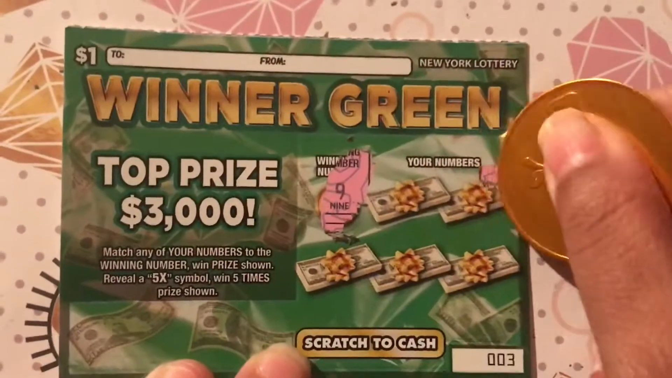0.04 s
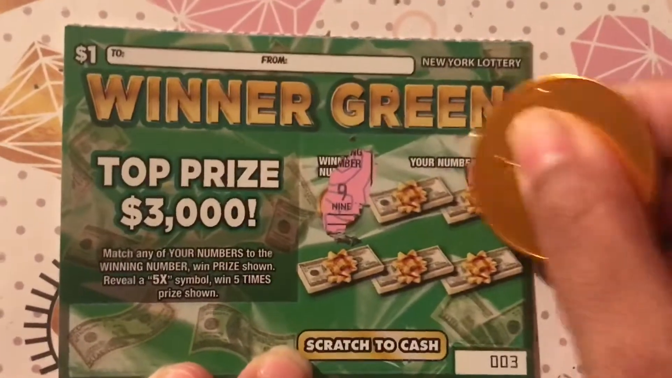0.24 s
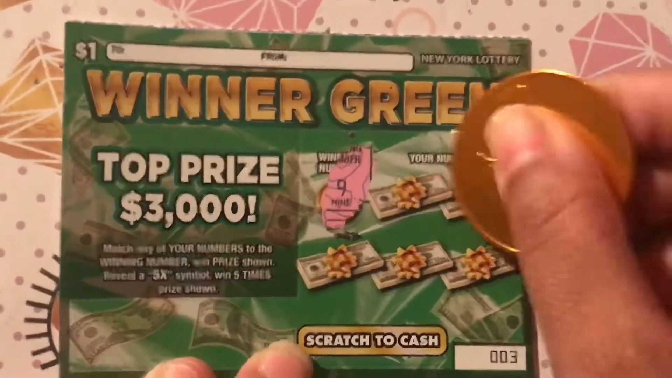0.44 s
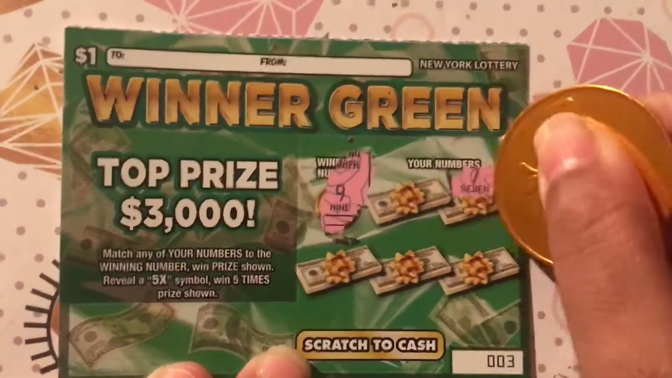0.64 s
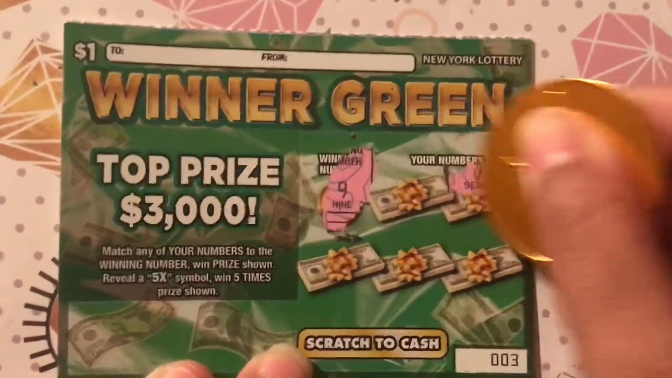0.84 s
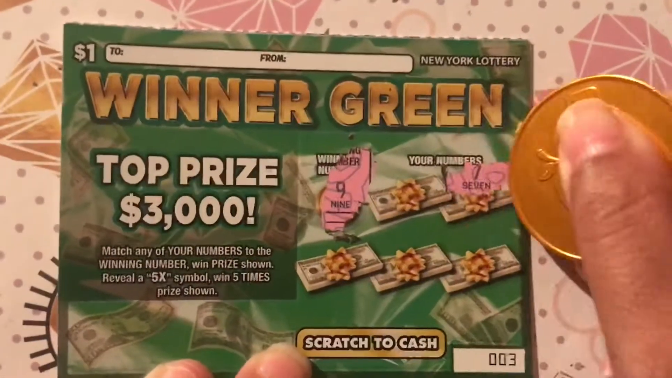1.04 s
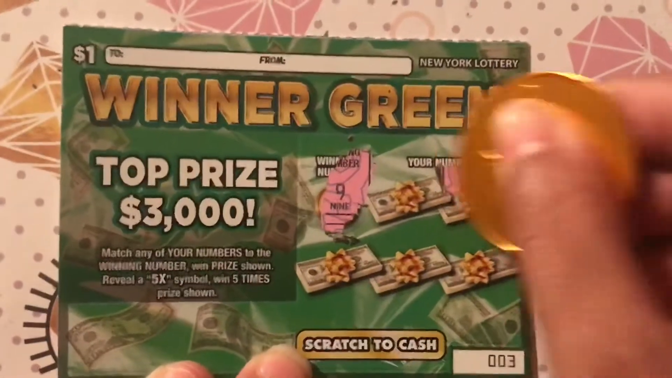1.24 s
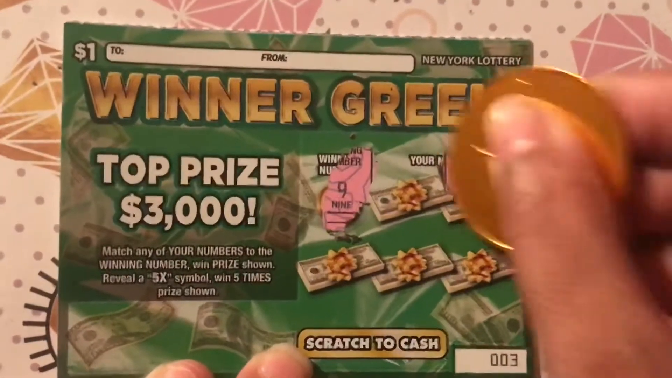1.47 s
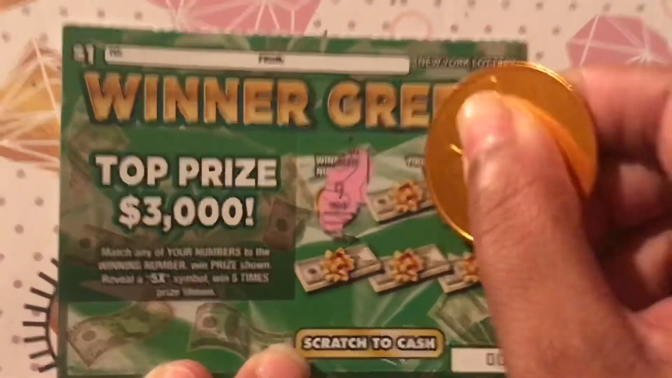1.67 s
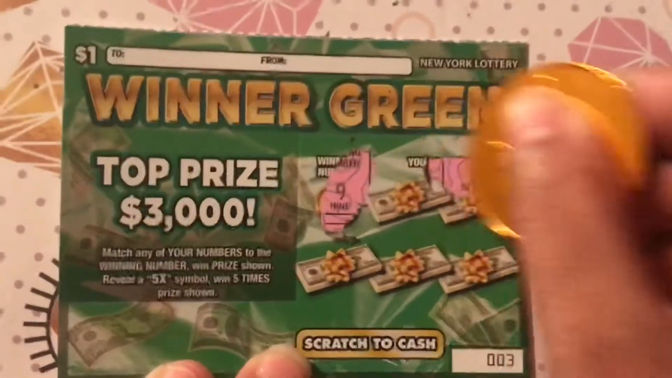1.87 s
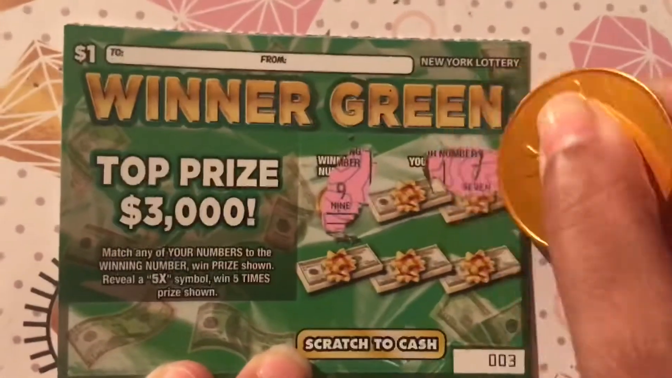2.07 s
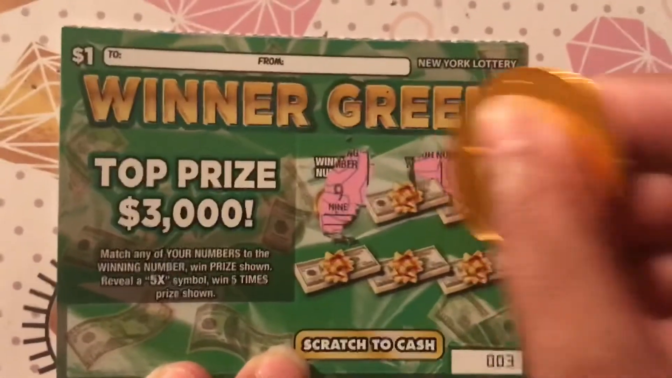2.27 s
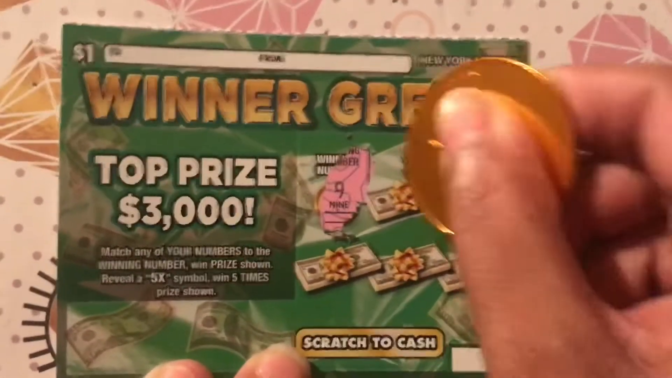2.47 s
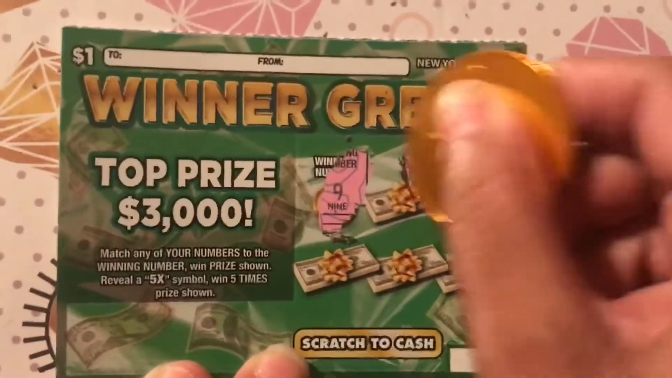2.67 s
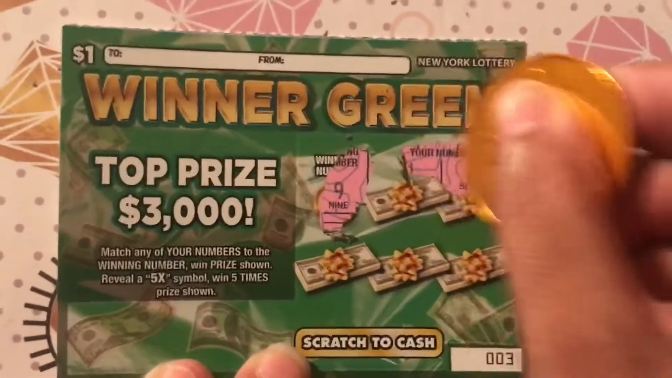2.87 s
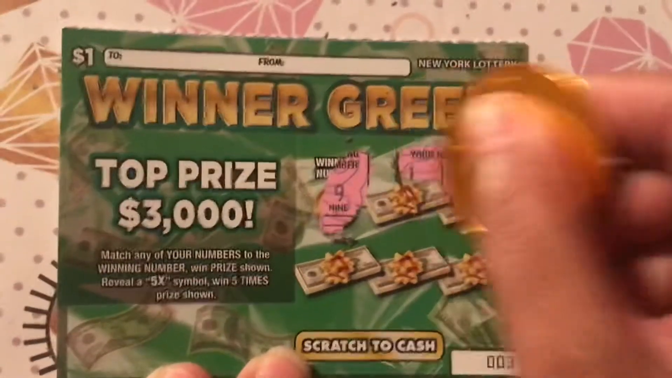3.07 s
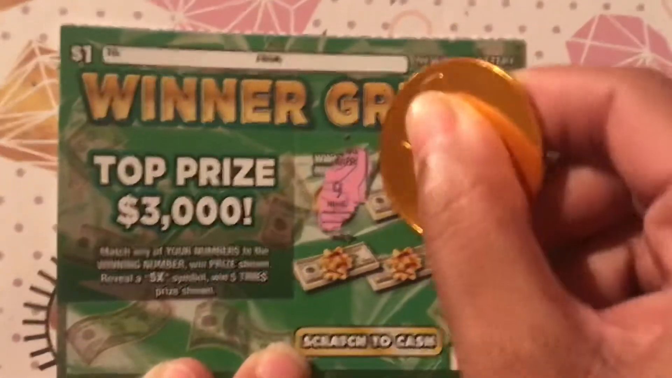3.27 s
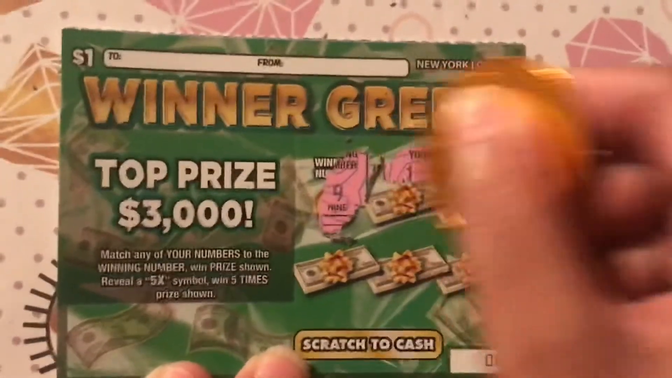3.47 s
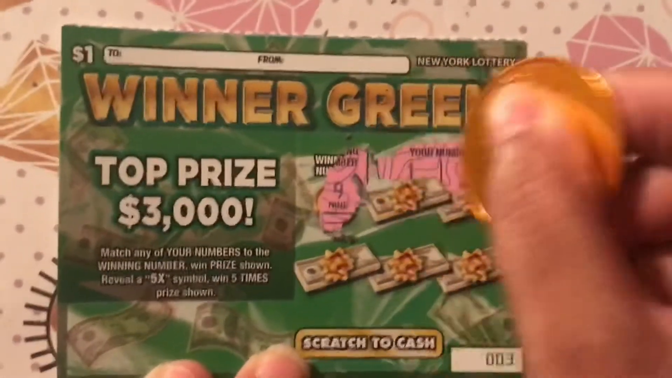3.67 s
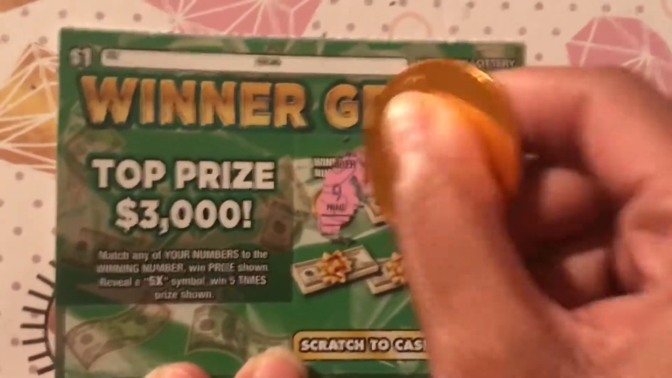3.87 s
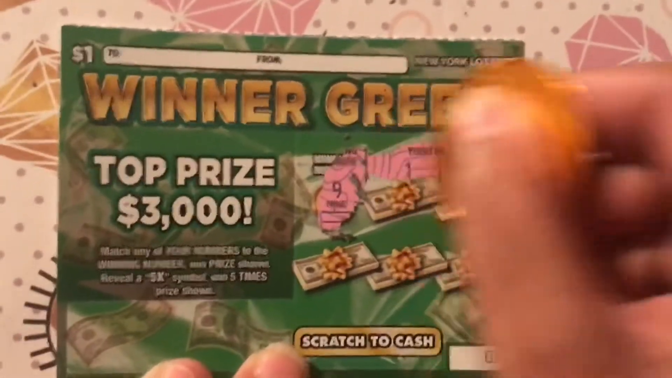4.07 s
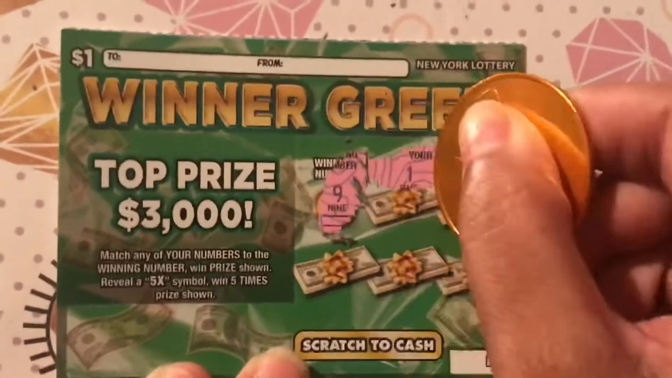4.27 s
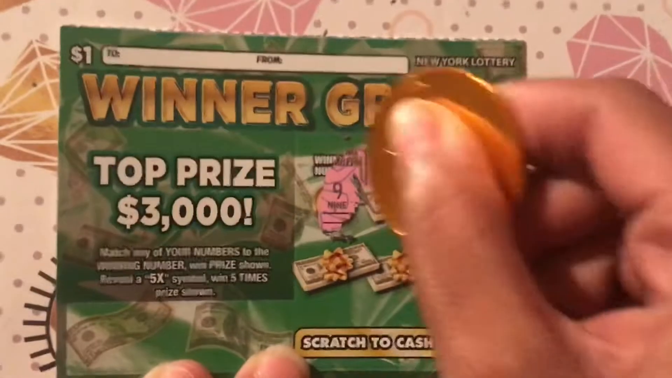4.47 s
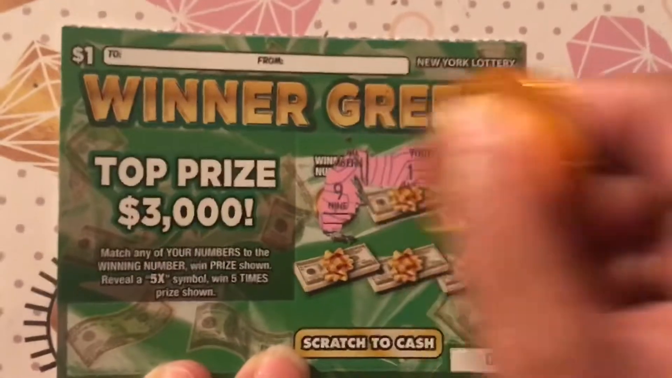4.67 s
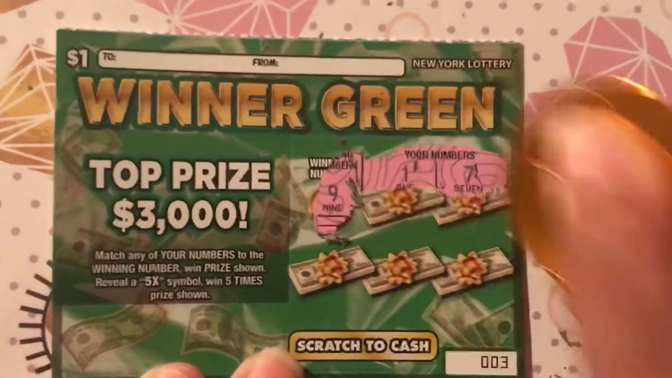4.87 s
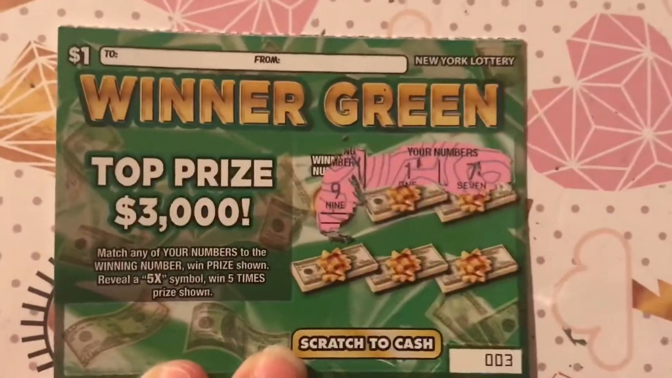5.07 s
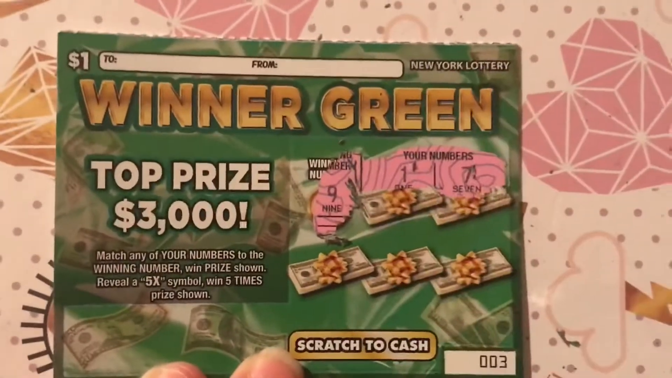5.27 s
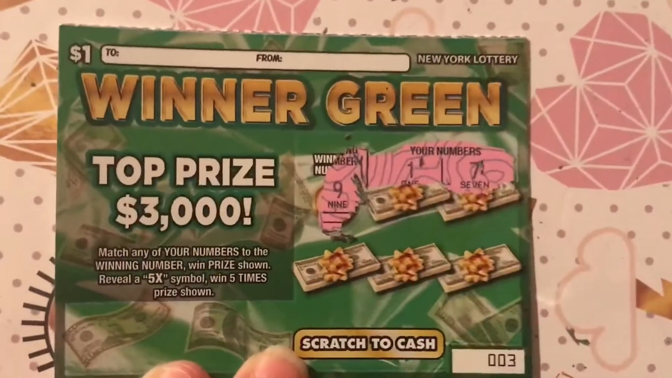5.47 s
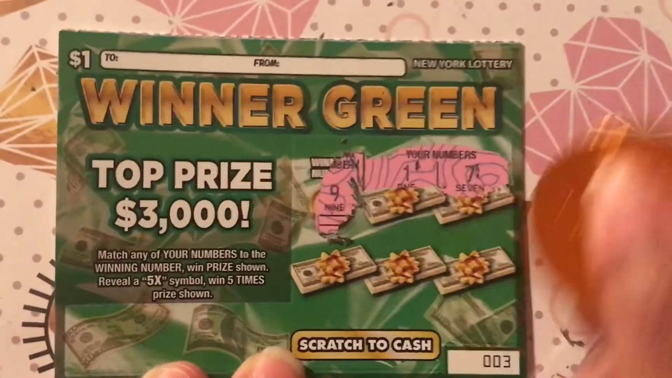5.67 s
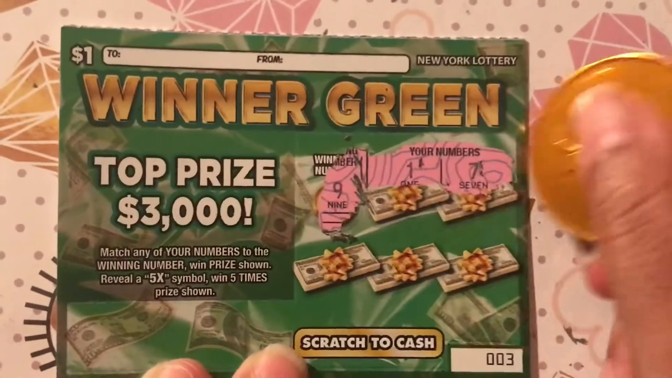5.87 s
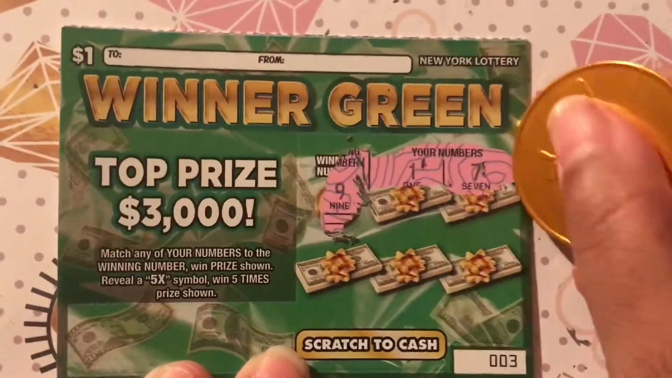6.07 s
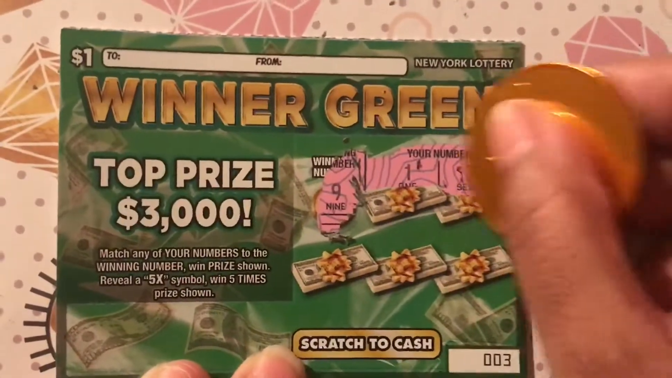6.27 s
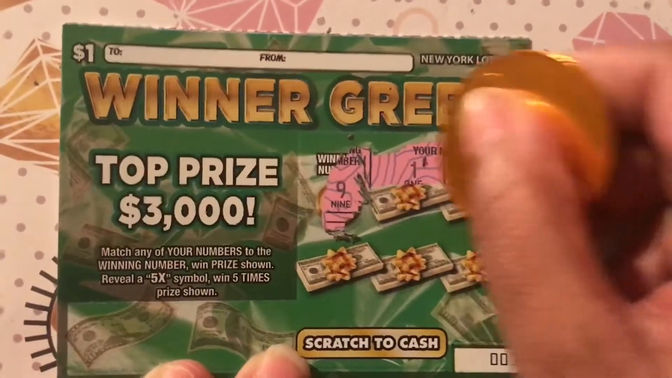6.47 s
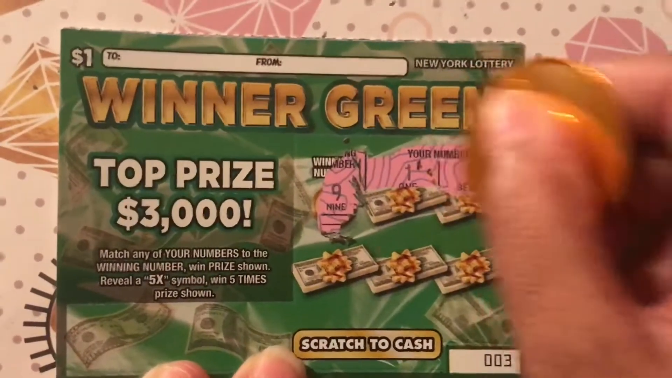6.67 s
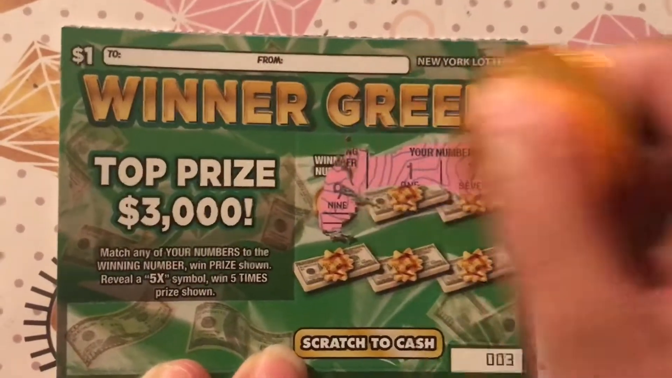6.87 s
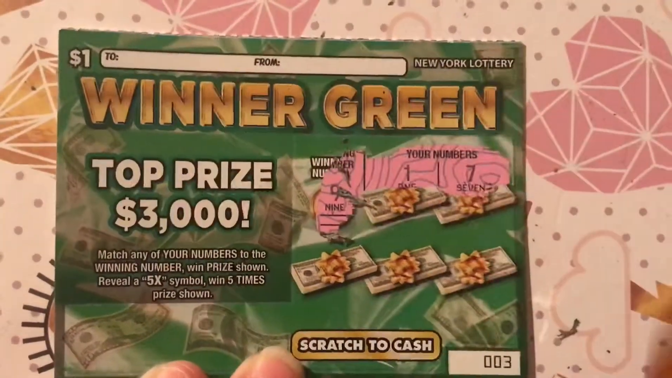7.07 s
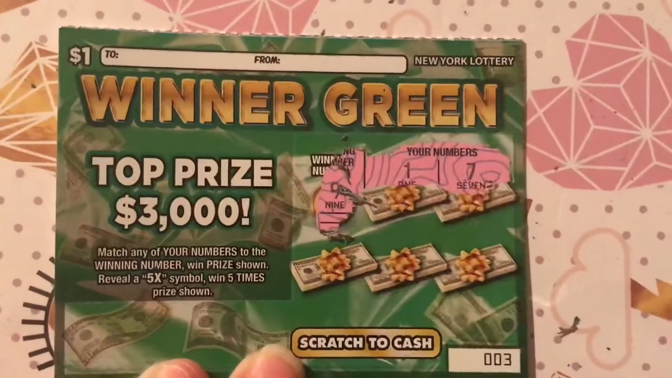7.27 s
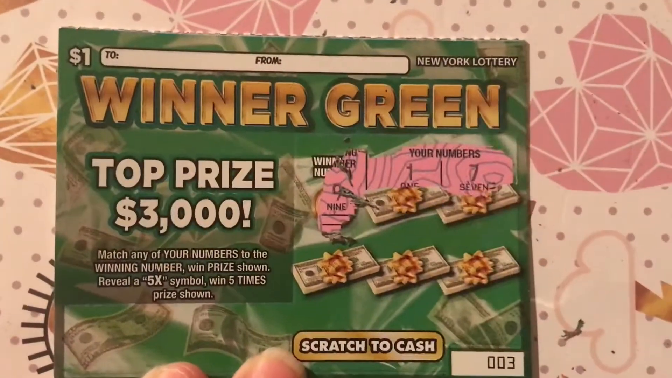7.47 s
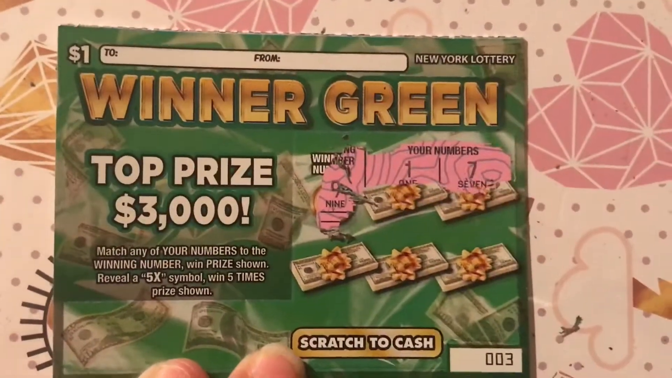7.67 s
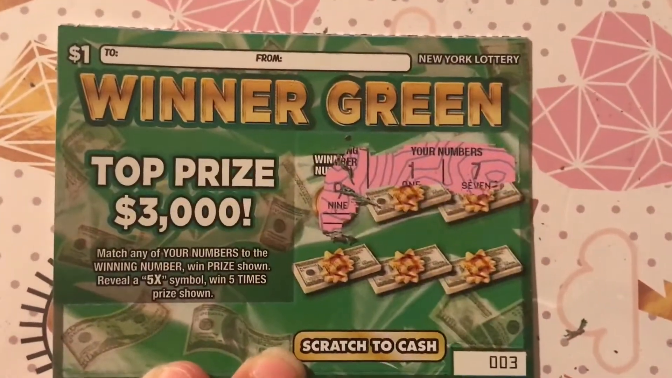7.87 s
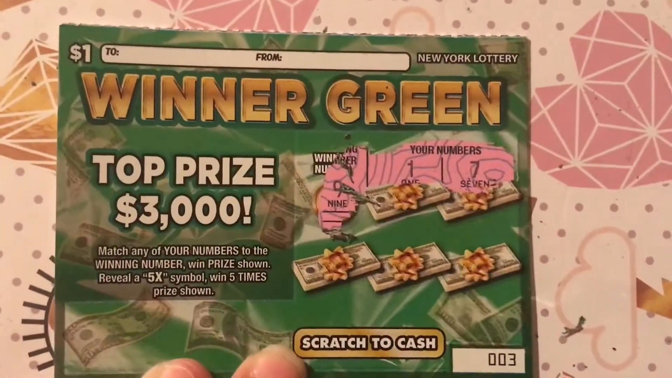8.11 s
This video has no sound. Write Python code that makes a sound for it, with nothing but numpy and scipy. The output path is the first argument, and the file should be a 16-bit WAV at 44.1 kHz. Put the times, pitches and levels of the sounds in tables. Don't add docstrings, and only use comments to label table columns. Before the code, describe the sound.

Close up in a quiet, dry room, a coin scratches the coating off a paper card: a few strokes, a brief gap, then a long steady run of about eight a second, hard pulls alternating with lighter returns. Card drums, coating hisses, small clicks and dull table thumps mix in. After a pause with a faint finger rub, a short lighter burst ends in a coarse dig, then quiet.

```python
import sys
import numpy as np
from scipy import signal
from scipy.fft import rfft, irfft
from scipy.io import wavfile
from scipy.ndimage import uniform_filter1d

SR = 44100
rng = np.random.default_rng(int(sys.argv[2]) if len(sys.argv) > 2 else 0)


def unload_audio(sound):
    columns = np.transpose(np.atleast_2d(sound))
    steps = np.round(np.clip(columns, -1, 1) * 32767)
    wavfile.write(sys.argv[1], SR, steps.astype(np.int16))


def undo_db(level):
    steps = np.asarray(level, float) / 20
    return 10 ** steps


N = 358974

# (pitch [Hz], width [Hz], level [dB])
CARD_MODES = [(217, 16.6, -2), (390, 8.7, -5.5), (551, 49.4, -0.5), (693.4, 51, -1), (799, 57, -4),
              (937, 72, -4.5), (1086, 91, -6.5), (1335, 330, -12.5), (1810, 650, -16.5)]
# (frequency [Hz], level [dB per Hz])
COATING_COLOUR = [(700, -27), (1200, -4), (1900, -1.5), (3200, 1), (3800, -6.5), (4900, -6.5), (5800, -2),
                  (7600, -2), (8900, -5.5), (10700, -1.5), (11800, -8), (12800, -14), (15900, -13.5)]

SET_OFF_S, RUN_OUT_S = 0.014, 0.0087
# (on pulls, on returns, per dB of hiss, per dB of flatness)
RASP_GRIP = (-9.5, -1, 0.36, 0.2539)


def rms_one(x):
    return x / np.sqrt(np.mean(x ** 2) + 1e-20)


def filtered(x, order, hz, kind="low"):
    return signal.sosfilt(signal.butter(order, hz, kind, fs=SR, output="sos"), x)


def gain_over_time(tables):
    out = np.zeros(N)
    for rows in map(np.array, tables):
        times, dbs = rows[:, 0], rows[:, 1]
        i = np.arange(int(times[0] * SR), min(int(times[-1] * SR), N))
        fade = np.minimum(np.minimum(i - i[0], i[-1] - i) / 200, 1)
        out[i] = np.maximum(out[i], fade * undo_db(np.interp(i / SR, times, dbs)))
    return out


def coloured(x, spectrum):
    hz, db = np.transpose(spectrum)
    grid = np.maximum(np.arange(4097) * SR / 8192, 1)
    cepstrum = irfft(np.log(undo_db(np.interp(np.log(grid), np.log(hz), db))))
    cepstrum[1:4096] *= 2
    cepstrum[4097:] = 0
    response = irfft(np.exp(rfft(cepstrum)))
    return rms_one(signal.fftconvolve(x, response)[:N])


def resonance(x, hz, width_hz):
    r = np.exp(-np.pi * width_hz / SR)
    feedback = [1, -2 * r * np.cos(2 * np.pi * hz / SR), r * r]
    return signal.lfilter([(1 - r * r) / 2, 0, (r * r - 1) / 2], feedback, x + 1e-18)


def drift(rate_hz):
    return rms_one(filtered(rng.standard_normal(N + 9000), 2, rate_hz)[9000:])


def grains(per_s, spread_db):
    sizes = undo_db(spread_db * np.minimum(rng.exponential(1, N), 4)) * rng.choice([-1, 1], N)
    return rms_one(sizes * (rng.random(N) < per_s / SR))


def clicks(times, dbs):
    out = np.zeros(N)
    out[(np.asarray(times) * SR).astype(int)] = undo_db(np.asarray(dbs))
    return out


def strokes():
    # (start [s], length [s], card drumming [dB], coating hiss [dB], growth along the stroke [dB])
    pulls = [(0.037, 0.069, -39, -52, 6), (0.324, 0.079, -36, -48.5, 10), (0.615, 0.075, -39.5, -54, 6),
             (1.055, 0.068, -38.5, -47, 26), (1.294, 0.092, -38, -41, -6), (1.538, 0.089, -35.5, -47, 11),
             (1.788, 0.1, -38.5, -43.5, -10.5), (2.054, 0.083, -36.5, -44.5, 12),
             (2.304, 0.076, -36.5, -46.5, 4), (2.555, 0.089, -38.5, -41, 3), (2.818, 0.08, -37, -46.5, 7.5),
             (3.096, 0.09, -38.5, -45.5, 7), (3.396, 0.073, -35.5, -46, 18.5),
             (3.694, 0.089, -36.5, -46.5, 3), (4.0, 0.079, -31.5, -43, 15), (4.3, 0.078, -35.5, -46.5, 9.5),
             (4.594, 0.083, -34, -42.5, 5), (6.071, 0.094, -49, -70.5, 27), (6.35, 0.099, -43, -53.5, -1.5),
             (6.608, 0.11, -42.5, -50.5, 5.5)]
    # (start [s], length [s], card drumming [dB], coating hiss [dB], growth along the stroke [dB])
    returns = [(0.187, 0.08, -45.5, -57, -15), (0.445, 0.11, -47.5, -53.5, -15.5),
               (0.747, 0.077, -54.5, -62.5, -7), (1.175, 0.087, -47, -53.5, 10),
               (1.429, 0.073, -47.5, -54, -2), (1.671, 0.082, -48.5, -52.5, -0.5),
               (1.929, 0.083, -48.5, -55, 0), (2.187, 0.082, -46.5, -53.5, -9),
               (2.429, 0.088, -49.0, -57, 7), (2.702, 0.071, -47.5, -57, 6),
               (2.976, 0.077, -47, -48.5, 2.5), (3.252, 0.078, -46.5, -48, -1),
               (3.556, 0.079, -46.5, -49, -3), (3.83, 0.099, -48, -50, 12), (4.133, 0.078, -45, -42, 12.5),
               (4.419, 0.1, -46.1, -48, 3), (4.708, 0.037, -49.5, -53, -10), (6.225, 0.08, -54, -61.5, -24),
               (6.493, 0.075, -54, -56.5, -1.5), (6.755, 0.11, -47.5, -50.5, 10)]
    # (start [s], length [s], card drumming [dB], coating hiss [dB], growth along the stroke [dB])
    creeps = [
        (1.014, 0.11, -56, -68, 1),
    ]
    rows = [(*row, 0) for row in pulls] + [(*row, 1) for row in returns + creeps]
    return np.array(sorted(rows))


def grip(rule):
    # (time [s], level [dB])
    flatness = [(0, 17), (.45, 18.5), (1.1, 13), (1.35, 4), (1.55, 9), (2.1, 3), (2.6, -3), (3.4, -1),
                (4.3, -14), (4.6, 7), (6.07, 34.5), (6.36, 15.5), (6.5, -18), (6.62, 11), (6.8, -9)]
    on_pull, on_return, per_hiss, per_flatness = rule
    usual_hiss_db = -53
    rows = strokes()
    db = np.where(rows[:, 5], on_return, on_pull)
    db = db + per_hiss * (rows[:, 3] - usual_hiss_db)
    db = db + per_flatness * np.interp(rows[:, 0], *np.transpose(flatness))
    starts = ((rows[1:, 0] - SET_OFF_S) * SR).astype(int)
    return np.repeat(db, np.diff(np.append(0, starts), append=N))


def speed():
    rest_speed, top_speed = 0.13, (0.9, 0.88)
    fastest_at = (0.63, 0.6)
    out = np.full(N, rest_speed)
    for start, length, *_, way in strokes():
        w = int(way)
        i = np.arange(int((start - SET_OFF_S) * SR), int((start + length + RUN_OUT_S) * SR))
        turn = np.interp(np.linspace(0, 1, len(i)), [0, fastest_at[w], 1], [0, np.pi / 2, np.pi])
        out[i] = rest_speed + (top_speed[w] - rest_speed) * np.abs(np.sin(turn)) ** 1.064
    return out * undo_db(0.25 * grip(RASP_GRIP))


def swell(start, length, db, slope_db, arch_db, rise_s, fall_s):
    i = np.arange(max(int((start - .05) * SR), 0), int((start + length + .06) * SR))
    t = i / SR - start
    along = np.clip(t / length, 0, 1) - .5
    edges = undo_db(20 - 20 * t / rise_s) + undo_db(20 - 20 * (length - t) / fall_s)
    return i, undo_db(db + slope_db * along - 4 * arch_db * along ** 2) / np.sqrt(1 + edges)


def drumming():
    # (time [s], level [dB])
    surges = [(0.05, -40), (0.372, -32), (0.666, -29), (1.089, -27), (1.336, -29), (1.553, -22),
              (1.601, -22.5), (1.815, -40), (1.846, -35), (2.111, -25), (2.361, -27.5), (2.562, -29.5),
              (2.827, -33), (3.124, -26), (3.416, -26), (3.459, -25), (4.008, -24), (4.309, -26),
              (6.357, -38), (6.624, -44)]
    rise_s, fall_s = (0.0059, 0.0058), (0.0079, 0.0046)
    follows, sag_db = (0.42, 0.54), (5., -2.1)
    arch_db = (-0.7, -2.3)
    surge_rise_s, surge_fall_s = 0.0023, 0.0055
    power = np.zeros(N)
    for start, length, db, _, growth, way in strokes():
        w = int(way)
        slope_db = follows[w] * growth - sag_db[w]
        i, gain = swell(start, length, db, slope_db, arch_db[w], rise_s[w], fall_s[w])
        power[i] += gain ** 2
    for s, db in surges:
        i, gain = swell(s - surge_rise_s, surge_rise_s + surge_fall_s, db, 0, 0, surge_rise_s, surge_fall_s)
        power[i] += gain ** 2
    return np.sqrt(power)


def reach(ratio):
    return ratio ** 1.9 / (1 + ratio ** 5)


def card():
    # (pitch [Hz], width [Hz], level under the card [dB])
    table_top = [(53.6, 8.2, -6), (115, 31, -14.5), (184.7, 55, -10)]
    pressure_grip = (6.5, 2.5, -0.27, 0.06)
    finger_damping_hz, lumpy_db = 30, 2
    evened = .85
    slips = grains(per_s=4000, spread_db=3.5)
    bump_rate_hz = 1257.0 * speed()
    modes = np.zeros(N)
    for k, (hz, width, db) in enumerate(CARD_MODES):
        gain = undo_db(db + lumpy_db * drift(25.0) + grip(pressure_grip) * (hz < 450))
        tone = resonance(slips, hz, width + finger_damping_hz)
        modes += (-1) ** k * gain * reach(hz / bump_rate_hz) * tone
    modes = filtered(modes, 2, 2300.)
    steady = modes / uniform_filter1d(modes ** 2 + 1e-12, size=700) ** (evened / 2)
    drive = drumming()
    table = sum(undo_db(db + 19.5) * resonance(drive * slips, hz, width) for hz, width, db in table_top)
    return drive * rms_one(steady) + table


def tear():
    late_s, early_s = (0.0013, 0.0027), (0.0036, 0.0029)
    rise_s, fall_s = (0.0073, 0.0081), (.0045, .006)
    arch_db = (4, 2.6)
    out = np.zeros(N)
    for start, length, _, db, growth, way in strokes():
        w = int(way)
        tearing_s = length - late_s[w] - early_s[w]
        i, gain = swell(start + late_s[w], tearing_s, db, growth, arch_db[w], rise_s[w], fall_s[w])
        out[i] += gain
    return out


def coin(force):
    # (pitch [Hz], width [Hz], level over the hiss [dB])
    coin_modes = [(4200, 510, -3), (6950, 490, -0.5), (9700, 350, 17.5), (14400, 3450, 9.5)]
    grip_damping_hz = 250
    low_db = grip((-4.5, -5.5, 0.58, 1.))
    high_db = grip((-5.5, -7.5, -0.16, 0.0854))
    duller_db = -0.2 * low_db
    rasp = filtered(force, 2, 3800.)
    top = filtered(force, 2, 11000., "high")
    out = force + (undo_db(grip(RASP_GRIP)) - 1) * rasp + (undo_db(duller_db) - 1) * top
    for free_db, (hz, width, db) in zip([low_db, .5 * high_db, high_db, duller_db], coin_modes):
        damped = width + grip_damping_hz
        ring = resonance(resonance(force, hz, damped), hz, damped)
        out = out + undo_db(db + free_db + 2. * drift(6.4)) * ring
    return out


def coating():
    tearing = coloured(grains(per_s=30000, spread_db=2.5), COATING_COLOUR) * undo_db(1.6 * drift(140))
    below = [filtered(tearing, 2, hz) for hz in (2310.0, 3550.0, 6140.0, 8850.0)] + [tearing]
    ranges = np.diff([np.zeros(N)] + below, axis=0)
    patchy = np.zeros(N)
    for part, speed_power in zip(ranges, (0.96, 0.23, 0.062, 0.037, 0.048)):
        patchy += part * undo_db(2.2 * drift(12.3)) * speed() ** speed_power
    return tear() * rms_one(coin(patchy))


def snags():
    # (time [s], peak [dB], length [s])
    ridges = [(0.046, -30.5, 0.014), (0.075, -39, 0.009), (0.202, -25, 0.011), (0.2233, -28.5, 0.026),
              (0.3366, -27.5, 0.009), (0.3693, -21.5, 0.01), (0.45, -39, 0.015), (0.642, -31.5, 0.01),
              (0.6677, -18, 0.0024), (1.0105, -29.5, 0.004), (1.066, -30.5, 0.0057), (1.091, -22.5, 0.008),
              (1.201, -38, 0.0061), (1.237, -28.5, 0.018), (1.595, -22, 0.0029), (1.841, -24.5, 0.022),
              (2.1106, -13, 0.0027), (2.357, -18.5, 0.005), (2.605, -27, 0.0072), (2.875, -25, 0.0063),
              (3.1455, -21.5, 0.012), (3.448, -23, 0.016), (3.7457, -15.5, 0.0091), (3.7557, -17, 0.0052),
              (3.778, -31.5, 0.0069), (4.364, -32, 0.013), (4.426, -32.5, 0.017), (6.707, -31, 0.0057),
              (6.8417, -21, 0.011), (6.8575, -34, 0.0033)]
    builds_s = 0.0017
    burst, t = np.zeros(N), np.arange(SR // 20) / SR
    for s, db, length in ridges:
        i = int(s * SR)
        shape = np.tanh(t / builds_s) * np.exp(-(t / max(length, .001)) ** 4)
        burst[i:i + len(t)] += undo_db(db - 18.5) * shape
    return coin(burst * coloured(rng.standard_normal(N), COATING_COLOUR))


def knocks():
    # (time [s], peak [dB])
    drops = [(0.372, -25), (0.665, -13), (1.012, -19), (1.09, -22), (1.337, -33), (1.551, -32),
             (1.599, -23), (1.813, -33), (1.845, -33), (2.11, -2), (2.359, -18), (2.828, -29), (3.12, -37),
             (3.413, -40), (3.458, -9), (3.761, -23), (4.008, -49), (4.034, -21), (4.059, -10),
             (4.311, -18), (4.623, -8), (4.653, -35), (4.782, -26)]
    s, peak_db = np.transpose(drops)
    strengths = rng.normal(0, 0.67, (len(s), len(CARD_MODES)))
    rung = np.zeros(N)
    for k, (hz, width, db) in enumerate(CARD_MODES):
        rung += resonance(clicks(s, peak_db + db + 14 + strengths[:, k]), hz, width)
    return filtered(rung, 2, 1300)


def dig():
    # (time [s], level [dB])
    dig_curves = [
        [(6.758, -64), (6.776, -56), (6.82, -51), (6.85, -51), (6.861, -72)],
    ]
    fibres = filtered(grains(per_s=5800, spread_db=7), 2, [1000., 3500.], "band")
    return gain_over_time(dig_curves) * rms_one(fibres)


def shoves():
    # (time [s], peak [dB], pitch [Hz])
    pushes = [(0.07, -33, 61), (0.263, -33, 90.5), (0.395, -39, 57.7), (0.675, -34, 83), (1.091, -33, 65.6),
              (1.605, -30.5, 73.6), (2.111, -30.5, 80), (2.369, -33, 74.6), (2.607, -38, 75),
              (2.881, -30, 76), (3.163, -33, 66), (3.466, -24.5, 90), (3.765, -24, 79), (4.007, -35, 77.6),
              (4.308, -30.5, 88), (4.382, -41, 73), (4.604, -47, 107), (6.298, -36.5, 88.5),
              (6.708, -35, 130), (6.881, -41, 68.4)]
    cycles = 0.34
    out, t = np.zeros(N), np.arange(SR // 8) / SR
    for s, db, hz in pushes:
        i = int((s - .004) * SR)
        swing = np.sin(2 * np.pi * hz * t) * np.tanh(t * hz * 9.9) * np.exp(-t * hz / cycles)
        out[i:i + len(t)] -= undo_db(db + 6.5) * swing
    return out


def touches():
    # (time [s], peak [dB])
    ticks = [
        (1.0102, -42),
        (5.5153, -48),
        (5.664, -48),
        (6.0683, -39.5),
    ]
    s, db = np.transpose(ticks)
    decay = np.exp(-np.arange(400) / (0.00065 * SR))
    burst = signal.fftconvolve(clicks(s, db - 2.5), decay)[:N]
    return filtered(burst * rng.standard_normal(N), 4, [300., 7000.], "band")


def wipe():
    # (time [s], level [dB])
    finger_curves = [
        [(4.85, -98), (4.872, -77), (4.886, -67), (4.92, -81)],
        [(5.49, -86), (5.522, -63.5), (5.584, -59), (5.676, -68.5), (5.72, -80)],
    ]
    # (frequency [Hz], level [dB per Hz])
    skin_colour = [(880, -4.5), (1500, -5), (2060, -3), (3300, -2.5), (5840, -10), (8660, -3), (10400, -11),
                   (12700, -5), (15800, -4)]
    skin = coloured(rng.standard_normal(N), skin_colour)
    return gain_over_time(finger_curves) * skin * undo_db(1.7 * drift(60))


def room(x):
    t60_s, room_db = 0.1, -18.5
    t = np.arange(int(.4 * SR)) / SR
    tail = rng.standard_normal(len(t)) * undo_db(-60 * t / t60_s) * (t > .004)
    tail = signal.lfilter([.4], [1, -.6], tail)
    return undo_db(room_db) * signal.fftconvolve(x, tail / np.sqrt(np.sum(tail ** 2)))[:N]


def air():
    # (frequency [Hz], level [dB per Hz])
    air_colour = [(12, -54), (25, -8.5), (58, -0.5), (120, -9), (230, -15), (380, -21.5), (600, -24),
                  (1400, -31.5), (4000, -35), (7500, -38.5), (9500, -39.5), (10500, -41.5), (11500, -40),
                  (15900, -36.5)]
    return undo_db(-60.5 + .5 * drift(3.5)) * coloured(rng.standard_normal(N), air_colour)


def scene():
    near = card() + coating() + snags() + knocks() + touches() + wipe()
    space = room(near) + shoves() + air()
    return (near + space + dig())[None]


def low_pass(x):
    return signal.sosfilt(signal.butter(12, 16460, fs=SR, output="sos"), x)


def record(dry):
    thin = filtered(dry, 3, 40., "high")
    cut = signal.sosfilt(signal.ellip(10, .5, 70, 15950, fs=SR, output="sos"), thin)
    return low_pass(cut)


dry = scene()
out = record(dry)
unload_audio(out)
```